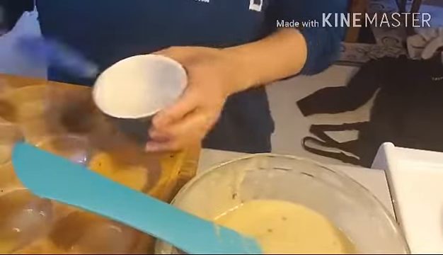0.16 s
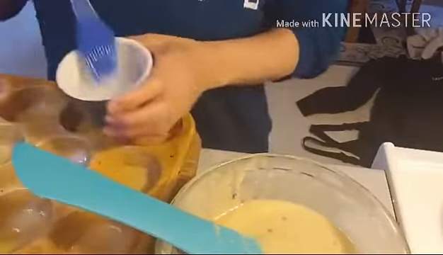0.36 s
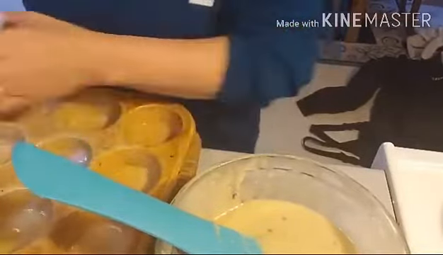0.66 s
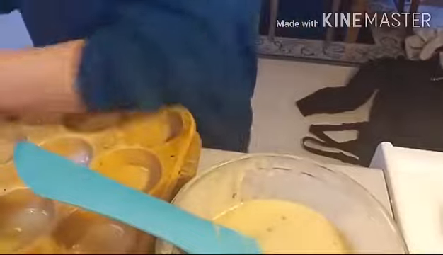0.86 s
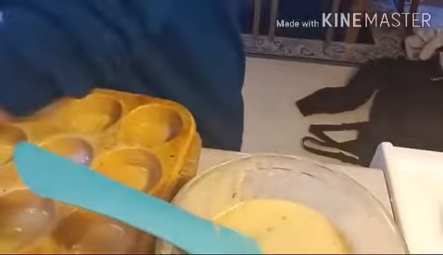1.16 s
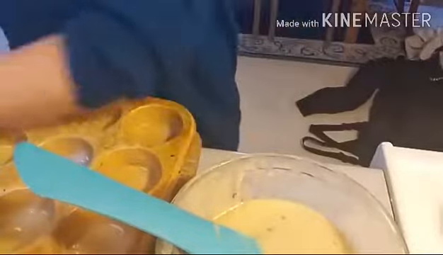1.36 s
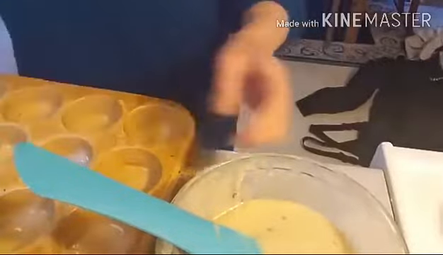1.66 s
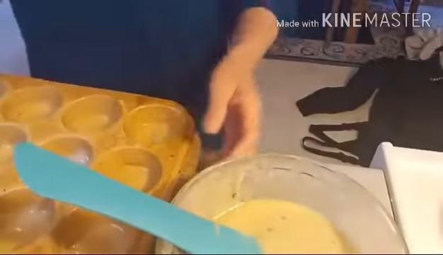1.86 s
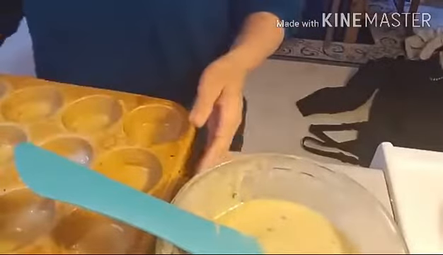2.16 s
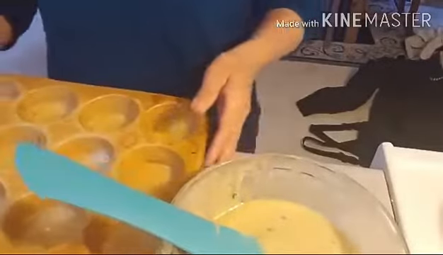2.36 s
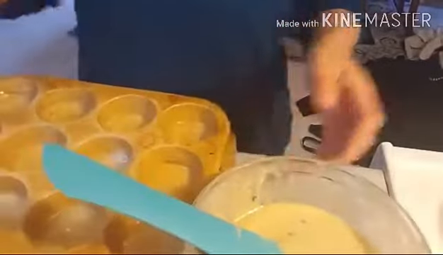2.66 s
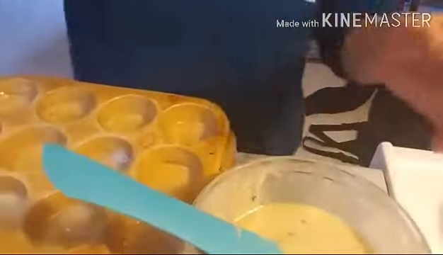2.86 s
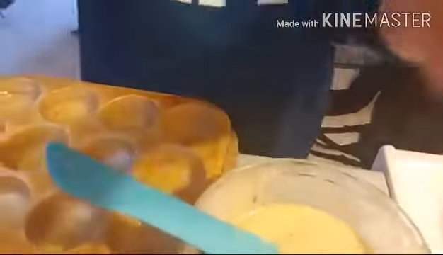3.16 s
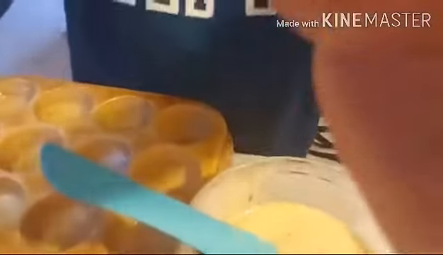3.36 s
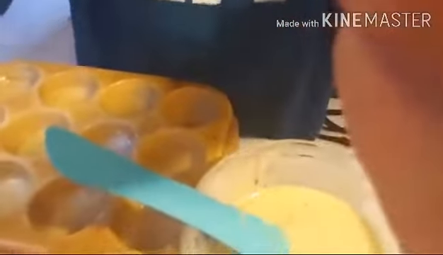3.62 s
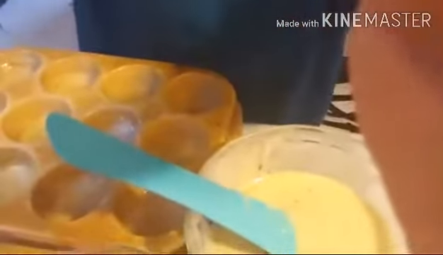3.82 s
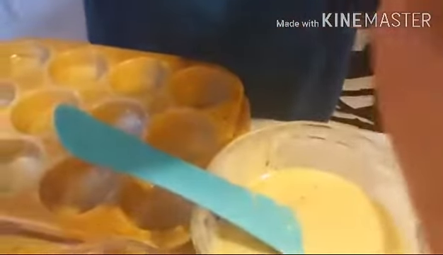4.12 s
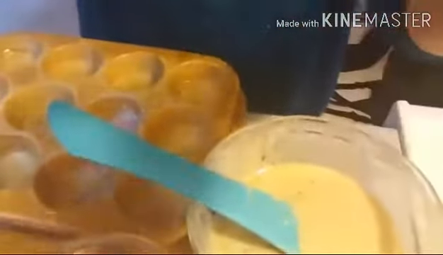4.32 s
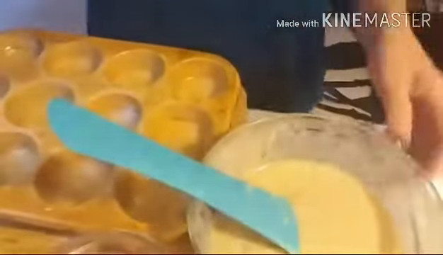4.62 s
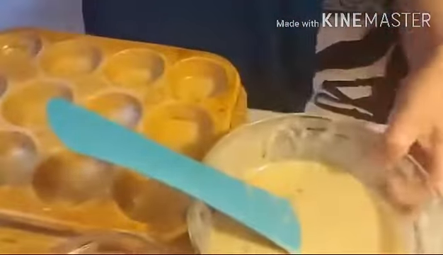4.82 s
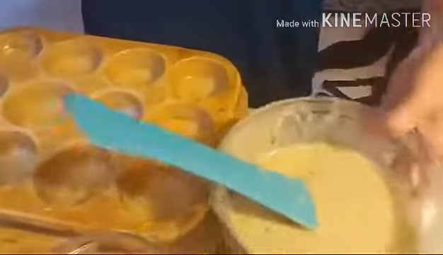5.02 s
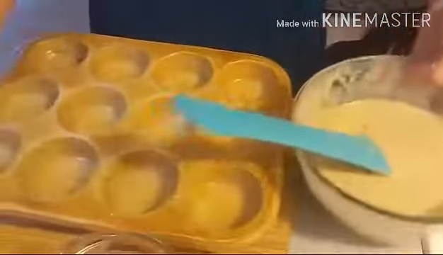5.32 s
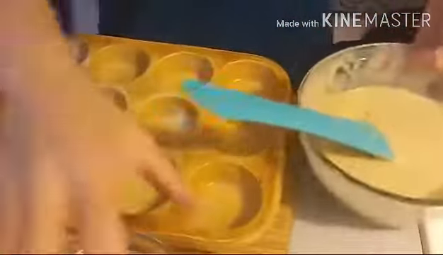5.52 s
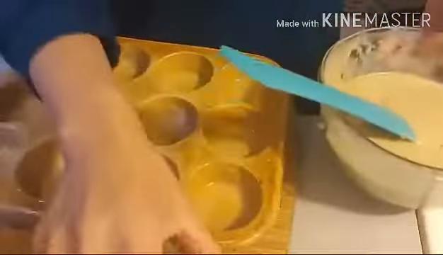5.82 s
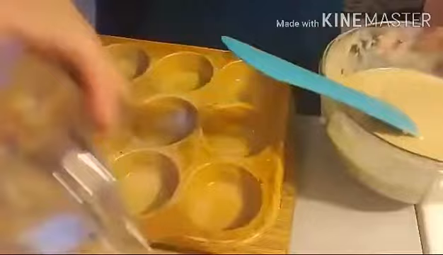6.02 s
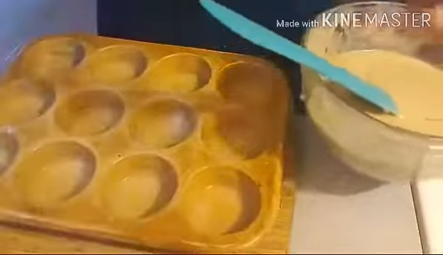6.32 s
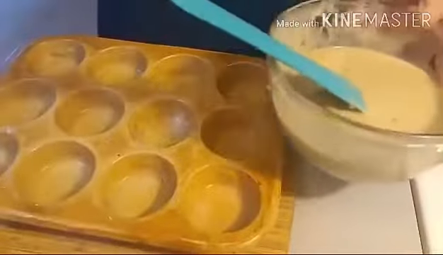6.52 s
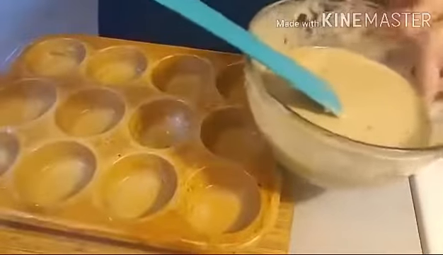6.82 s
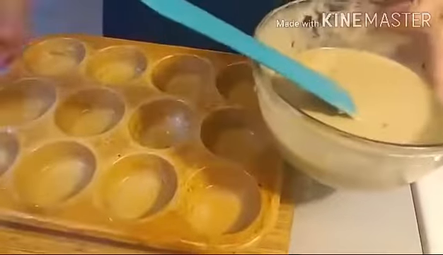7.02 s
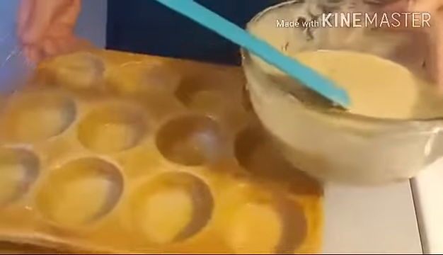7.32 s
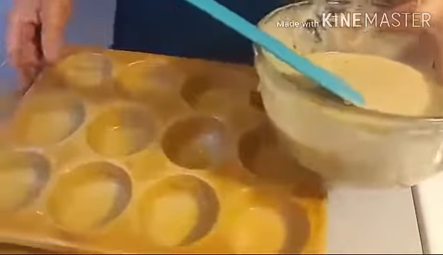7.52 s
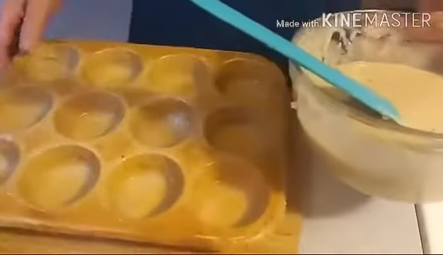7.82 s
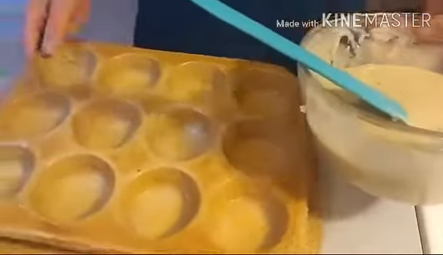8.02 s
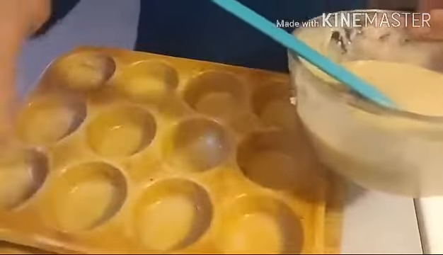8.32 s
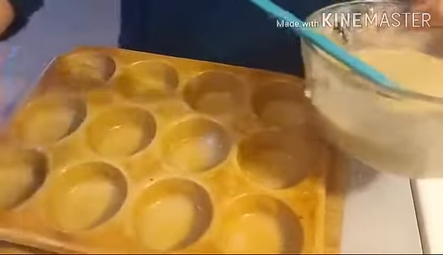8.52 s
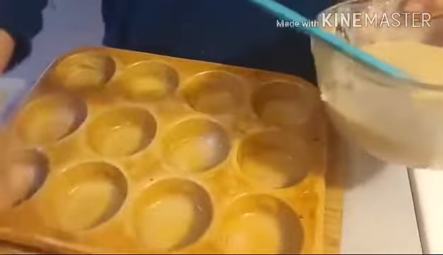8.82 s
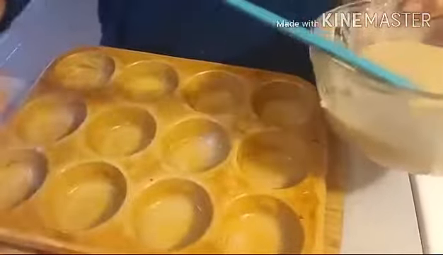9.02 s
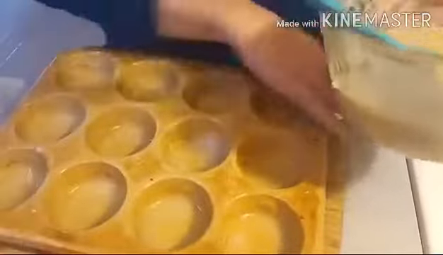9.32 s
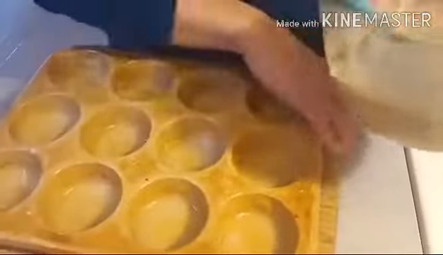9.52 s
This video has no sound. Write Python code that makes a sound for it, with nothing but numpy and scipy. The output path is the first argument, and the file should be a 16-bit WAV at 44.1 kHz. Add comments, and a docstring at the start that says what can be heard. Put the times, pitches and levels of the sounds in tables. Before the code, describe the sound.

Baking things are handled close by on a kitchen counter. A hollow tap comes first, then a cup lands with a light ring. Scattered clusters of dull utensil knocks shake the worktop, with quiet rubbing, rustling and tiny squeaks in the gaps. Near the end a metal muffin tin rattles, a glass bowl clinks briefly and something snaps sharply. A low hum runs underneath in the small room.

```python
"""Baking at a kitchen counter, over the low hum of a small room. A spatula taps a cup; the cup is set
down with a thin ting (1.5 s). Utensils knock on the worktop, which booms under the heaviest
(2.8, 5.6, 6.9 s); between them come rustling sleeves, soft bumps and faint stick-slip squeaks.
A nudged metal muffin tin rocks and clatters (7.7 s). Last, a glass bowl of batter is moved and
clinks (9.1 s), and a hard little snap follows."""
import sys
import numpy as np
from scipy import signal
from scipy.fft import rfft, irfft, next_fast_len
from scipy.io import wavfile
from scipy.ndimage import map_coordinates

SR = 44100
rng = np.random.default_rng(int(sys.argv[2]) if len(sys.argv) > 2 else 0)


def file_out(sig):
    """Save sig as 16-bit WAV at sys.argv[1]."""
    # one column per channel
    cols = np.atleast_2d(sig).T
    # limit, then scale
    lim = np.clip(cols, -1, 1)
    pcm = np.round(lim * 32767).astype(np.int16)
    wavfile.write(sys.argv[1], SR, pcm)


N = 426447
EVENT_N, LEAD_N = SR // 2, SR // 100  # samples per event; silence before its onset
EVENT_TIME_S = (np.arange(EVENT_N) - LEAD_N) / SR


def amp(db):
    """Decibels to gain."""
    return 10 ** (np.asarray(db) / 20)


def unit(x):
    """Scale to rms 1."""
    return x / np.sqrt(np.mean(x ** 2) + 1e-20)


def along(points, hz):
    """Interpolate (Hz, value) points on a log axis."""
    knots_hz, values = np.transpose(points)
    return np.interp(np.log(hz + 1), np.log(knots_hz + 1), values)


def wobble(per_s, size=EVENT_N):
    """Smooth random curve, per_s knots a second."""
    knots = rng.standard_normal(int(size * per_s / SR) + 4)
    return map_coordinates(knots, [np.arange(size) * per_s / SR], order=2)


def filtered(x, response):
    """Apply a gain given as a function of Hz."""
    n = x.shape[-1]
    padded = next_fast_len(n + 4096)
    return irfft(rfft(x, padded) * response(np.fft.rfftfreq(padded, 1 / SR)), padded)[..., :n]


def shaped(x, curve_db):
    """Filter by (Hz, dB) points."""
    return filtered(x, lambda hz: amp(along(curve_db, hz)))


# Stereo width. Each row: frequency in Hz, side minus mid in dB.
STEREO_WIDTH = [(60, -20), (230, -18), (330, -8), (700, -5.5), (1300, -2), (2500, 0), (10000, 0)]
def spread(pair):
    """Mid and side to left and right: bass alike, treble apart."""
    side = shaped(pair[1], STEREO_WIDTH)
    return np.array([pair[0] + side, pair[0] - side])


def noise(curve_db):
    """Coloured stereo noise, rms 1."""
    return unit(spread(shaped(rng.standard_normal((2, N)), curve_db)))


def place(events):
    """Mix (onset in seconds, sound) pairs into a stereo track."""
    track = np.zeros((2, N))
    for start_s, sound in events:
        start = round(start_s * SR) - LEAD_N
        track[:, start:start + sound.shape[-1]] += sound[..., :N - start]
    return track


def fade(t60_s, attack_s):
    """Quick rise, exponential fall."""
    t = np.maximum(EVENT_TIME_S, 0)
    return (1 - np.exp(-(t / attack_s) ** 2)) * amp(-60 * t / t60_s)


def body(modes, hz, base_db, ripple_db, corner_hz=1500):
    """Resonances over a dull base; each point of contact favours different ones."""
    response = amp(base_db) / (1 + 1j * hz / corner_hz)
    for k, (mode_hz, width_hz, db) in enumerate(modes):
        mode_hz *= rng.normal(1, .012)
        gain = (-1) ** k * amp(rng.normal(db, 2))
        damping = 1j * hz * width_hz
        response += gain * damping / (mode_hz ** 2 - hz ** 2 + damping)
    # crowded upper modes: a random ripple, causal so that its peaks ring on
    ripple = map_coordinates(rng.standard_normal(SR // 100), [hz / 160], order=2)
    ripple *= np.clip(hz / 3000, 0, 1)
    log_gain = np.log(amp(ripple_db * np.tanh(ripple)))
    upper_modes = np.exp(np.conj(signal.hilbert(log_gain)))
    rolloff_db = [(30, -10), (115, -7.5), (190, -3.5), (8000, -1.5), (11000, -5.5), (13000, -10)]
    return response * upper_modes * amp(along(rolloff_db, hz))


def contacts(table, t60_s, settle_s, settle_t60_s):
    """An object lands on one edge, then settles on the other with a longer rattle."""
    return [[(start_s, db, hardness_db, t60_s),
             (start_s + settle_s, db + settle_db, hardness_db, settle_t60_s)]
            for start_s, db, hardness_db, settle_db in table]


# Edges in Hz of the four bands: thud, knock, clack, tick.
BAND_EDGES_HZ = [90, 450, 1100, 3200, 13500]
def blows(landings, bands, modes, base_db, attack_s, treble_damping):
    """Each contact is a burst of chatter through the struck body; level and hardness set its bands."""
    hz = np.fft.rfftfreq(EVENT_N, 1 / SR)
    limits_hz = list(zip(BAND_EDGES_HZ, BAND_EDGES_HZ[1:]))
    centres_hz = np.sqrt(np.prod(limits_hz, axis=1))
    treble_share = hz ** 2 / (hz ** 2 + 3000 ** 2)
    width = amp(along(STEREO_WIDTH, hz))
    offset_db, hardness_slope = np.transpose(bands)
    events = []
    for landing in landings:
        colour = body(modes, hz, base_db, ripple_db=8)
        for start_s, db, hardness_db, t60_s in landing:
            chatter = rng.standard_normal((2, EVENT_N)) * amp(3.5 * wobble(per_s=200))
            bulk = rfft(chatter * fade(t60_s, attack_s))
            treble = rfft(chatter * fade(t60_s / treble_damping, attack_s * .8))
            mid, side = colour * (bulk * (1 - treble_share) + treble * treble_share)
            spectrum = np.array([mid + width * side, mid - width * side])
            target_db = db + offset_db + hardness_db * hardness_slope
            for _ in range(3):  # a band's level is its whole energy, counted as if spread over 20 ms
                power = np.mean(abs(spectrum) ** 2, axis=0) * 2 / EVENT_N / (.02 * SR)
                band_db = [10 * np.log10(power[(hz >= lo) & (hz < hi)].sum()) for lo, hi in limits_hz]
                spectrum *= amp(along(np.c_[centres_hz, target_db - band_db], hz))
            events.append((start_s, irfft(spectrum, EVENT_N)))
    return place(events)


def ring(modes, roughness):
    """Fading partials that beat as the object chatters; phase differs left and right."""
    sound = np.zeros((2, EVENT_N))
    for hz, db, t60_s in modes:
        stereo_phase = amp(along(STEREO_WIDTH, hz)) * rng.uniform(-np.pi, np.pi, (2, 1))
        phase = rng.uniform(0, 2 * np.pi) + stereo_phase + roughness * wobble(180 * roughness)
        beating = amp(3 * roughness * wobble(180 * roughness))
        partial = np.sin(2 * np.pi * hz * EVENT_TIME_S + phase)
        sound += amp(rng.normal(db, .71)) * beating * partial * fade(t60_s, attack_s=.00019)
    return sound


def thump(t60_s):
    """A low push with no ring."""
    curve_db = [(30, -11), (80, 1), (165, -.5), (280, -17.5), (700, -30.5), (2000, -67)]
    push = unit(shaped(rng.standard_normal(EVENT_N), curve_db))
    return amp(6) * push * fade(t60_s, attack_s=.016)


# Recording gain heard on the hum: it dips after loud knocks, then recovers.
# Each row: time in seconds, relative gain in dB.
HUM_GAIN = [(0, -54), (1.45, -51.5), (1.95, -58.5), (3.7, -60), (4.6, -57.5), (5.25, -52.5), (6.3, -58),
            (8, -55.5), (9.67, -56.5)]
# Rushing air. Each row: frequency in Hz, relative density in dB.
HUM_SPECTRUM = [(22, -17.5), (60, 0), (110, -7), (245, -5.5), (300, -14), (365, -10.5), (450, -20),
                (700, -23), (1060, -41), (2300, -44.5), (13000, -65)]
# Tones in the hum. Each row: frequency in Hz, relative level in dB.
HUM_TONES = [(164, -6), (246, -5.5), (356, -12)]
def hum():
    """Room hum, likely an appliance: low rushing air and wavering tones."""
    t = np.arange(N) / SR
    tones = sum(amp(db) * np.sin(2 * np.pi * hz * t + .29 * wobble(5.9, N)) for hz, db in HUM_TONES)
    gain_db = np.interp(t, *np.transpose(HUM_GAIN))
    return amp(gain_db - 5) * (noise(HUM_SPECTRUM) + tones)


# Noise floor. Each row: frequency in Hz, relative density in dB.
HISS_SPECTRUM = [(100, -0.5), (1500, -1), (4000, -5), (7500, 3), (13000, -14.5)]
def hiss():
    """Steady microphone hiss."""
    return amp(-88) * noise(HISS_SPECTRUM)


# Spatula on cup. Each row: start in seconds, level in dB, hardness in dB, settling offset in dB.
CUP_TAPS = [(.0615, -33, 0, -20)]
# Cup bands, thud to tick. Each row: offset in dB, dB per dB of hardness.
CUP_BANDS = [(-14, 0), (1, 0), (-2, 0), (-26, 0)]
# Cup resonances. Each row: frequency in Hz, width in Hz, gain in dB.
CUP_MODES = [(720, 220, 0), (1080, 260, 0), (1750, 260, -4), (3240, 400, -22), (4360, 500, -30)]
def cup_tap():
    """One dry, hollow tap of the spatula on the cup."""
    landings = contacts(CUP_TAPS, t60_s=.067, settle_s=.017, settle_t60_s=.088)
    return blows(landings, CUP_BANDS, CUP_MODES, base_db=-45.5, attack_s=.00059, treble_damping=1)


# Things put down. Each row: start in seconds, level in dB, hardness in dB, settling offset in dB.
KNOCKS = [(0.319, -58, -26, 3), (.645, -61.5, -26, -2), (1.545, -22, 1, -5), (1.628, -40, -11.5, -16),
          (1.647, -25, 7, -1.5), (1.721, -50, 12.5, -8), (2.672, -43, -22.5, -7), (2.679, -52, 11.5, -5),
          (2.814, -32, 10.5, -3), (2.82, -22, 7, -11.5), (2.828, -25.5, 12, -11.5), (2.877, -35, 7.5, -22),
          (2.924, -43.5, 10, -27), (5.312, -56, -7.5, 6), (5.486, -29, -5.5, 1), (5.561, -19, 1, -25),
          (5.687, -28, 5.5, -6), (5.75, -30, 5, -2.5), (6.04, -63, -12, 7.5), (6.188, -42.5, -21, -31),
          (6.595, -55.5, -3, -15), (6.876, -39, 7, -10), (6.908, -46, 10.5, -9), (6.927, -18, 0.5, -16.5),
          (6.928, -42, 8, -28), (7.04, -30, -2, -4), (7.244, -51.5, -4, -5), (8.103, -47, -5, -24.5),
          (9.273, -41, 11, -11.5)]
# Worktop bands, thud to tick. Each row: offset in dB, dB per dB of hardness.
WORKTOP_BANDS = [(-2.5, -0.21), (-1, 0), (-10.5, 1.1872), (-30, 2)]
# Worktop resonances. Each row: frequency in Hz, width in Hz, gain in dB.
WORKTOP_MODES = [(320, 130, -4), (410, 50, -5), (526, 240, 2), (790, 180, -1), (1380, 200, -8),
                 (1840, 130, -7), (3000, 500, -24), (3850, 400, -17), (4400, 700, -19), (5300, 300, -27)]
def worktop_knocks():
    """Dull knocks of things landing and settling on the worktop."""
    landings = contacts(KNOCKS, t60_s=.05, settle_s=.01, settle_t60_s=.19)
    return blows(landings, WORKTOP_BANDS, WORKTOP_MODES,
                 base_db=-11.5, attack_s=.0009, treble_damping=1.7)


def worktop_shudder():
    """The worktop shakes under each knock and each landing of the tin."""
    return place((start_s, amp(db - 26) * thump(t60_s=.39)) for start_s, db, _, _ in KNOCKS + TIN_HITS)


# Rubbed surfaces. Each row: frequency in Hz, width in Hz, gain in dB.
RUB_MODES = [(485, 140, -2.5), (780, 130, 5), (1250, 220, -4), (2150, 500, 0)]
def rub(centre_hz):
    """Tiny catches and slips excite a surface; its colour shifts as the contact wanders."""
    catches = amp(3.2 * wobble(45) + 3.2 * wobble(700))
    texture_db = [(.035 * centre_hz, -20), (.084 * centre_hz, -6), (centre_hz, 0), (4 * centre_hz, -14)]

    def surface(hz):
        resonances = body(RUB_MODES, hz, base_db=-7, ripple_db=6, corner_hz=6400)
        return amp(along(texture_db, hz)) * resonances

    def spot():
        friction = spread(rng.standard_normal((2, EVENT_N))) * catches
        return unit(filtered(friction, surface))

    here, there = spot(), spot()
    wander = wobble(14)
    return np.cos(wander) * here + np.sin(wander) * there


# Rubbing strokes. Each row: start in seconds, length in seconds, level in dB, centre in Hz.
STROKES = [(0.943, 0.082, -68.5, 4650), (1.153, 0.13, -64, 4170), (1.296, 0.1, -60, 2150),
           (1.857, 0.38, -73.5, 2150), (2.474, 0.16, -73, 1500), (2.707, 0.2153, -52.5, 2345),
           (3.811, 0.41, -74.5, 2818), (4.188, 0.23, -62.5, 2790), (5.302, 0.81, -50, 970),
           (5.438, 0.23, -45.5, 1377), (6.546, 0.27, -78, 6600), (7.565, 0.26, -52, 3510),
           (7.706, 0.035, -33, 5350), (8.086, 0.13, -47, 2630), (8.353, 0.37, -61, 5500),
           (8.388, 0.32, -58, 750), (9.274, 0.15, -46, 5800), (9.417, 0.21, -61, 2090)]
def rustle():
    """Sleeves, hands and the sliding tin rub; strokes swell and fade, cut off at 0.49 s."""
    events = []
    for start_s, length_s, db, centre_hz in STROKES:
        swell = np.sin(np.pi * np.clip(EVENT_TIME_S / length_s, 0, 1))
        events.append((start_s, amp(db) * rub(centre_hz) * swell))
    return place(events)


# Low bumps. Each row: start in seconds, relative level in dB, T60 in seconds.
BUMPS = [(1.093, -52, 0.48), (2.518, -50.5, 0.2), (3.17, -38, 0.21), (3.76, -40.5, 0.1),
         (4.279, -51.5, 0.28), (4.35, -50, 0.2), (4.958, -50, 0.2), (5.326, -51.5, 0.3),
         (7.545, -34.5, 0.086), (8.341, -51.5, 0.22)]
def bumps():
    """Soft, heavy contacts as the cook moves about."""
    return place((start_s, amp(db) * thump(t60_s)) for start_s, db, t60_s in BUMPS)


# Thin squeaks. Each row: start in seconds, length in seconds, first and last pitch in Hz,
# level in dB, octave offset in dB.
SQUEAKS = [(1.345, .11, 4000, 3980, -68, -9), (1.398, .05, 3440, 3400, -63, -2),
           (1.458, .05, 3460, 3410, -59, -3), (1.518, .03, 3950, 4000, -61, -14),
           (1.603, .045, 4060, 4020, -56, -14), (2.485, .05, 1520, 1460, -66, -30),
           (3.37, .13, 5070, 5160, -68, -20), (3.49, .07, 4950, 4730, -73, -25),
           (3.66, .11, 2720, 2380, -75, -30), (3.95, .16, 4180, 4220, -67, -17)]
def squeaks():
    """Unsteady stick-slip whistles with an octave overtone."""
    events = []
    for start_s, length_s, first_hz, last_hz, db, octave_db in SQUEAKS:
        progress = np.clip(EVENT_TIME_S / length_s, 0, 1)
        rasp_hz = 42 * wobble(700)
        hz = first_hz + (last_hz - first_hz) * progress + rasp_hz
        grip = amp(5 * wobble(45)) * np.sin(np.pi * progress)
        phase = 2 * np.pi * np.cumsum(hz) / SR
        whistle = np.sin(phase) + amp(octave_db) * np.sin(2 * phase)
        events.append((start_s, amp(db) * grip * whistle))
    return place(events)


# Cup tings. Each row: start in seconds, level in dB.
TINGS = [(1.551, -41.5), (1.653, -47)]
# Cup partials. Each row: frequency in Hz, gain in dB, T60 in seconds.
TING_PARTIALS = [(7050, 0, .15), (11100, -10, .1)]
def cup_tings():
    """The cup rings thin and high as it is set down."""
    return place((start_s, amp(db) * ring(TING_PARTIALS, roughness=1.2)) for start_s, db in TINGS)


# Utensil jingles. Each row: start in seconds, level in dB.
JINGLES = [(2.682, -40), (7.041, -55.5)]
# Utensil partials. Each row: frequency in Hz, gain in dB, T60 in seconds.
UTENSIL_PARTIALS = [(2570, -3, .04), (4660, 0, .1), (6530, -8, .07), (7270, -7, .07)]
def utensil_jingles():
    """A metal utensil rings faintly with some knocks."""
    return place((start_s, amp(db) * ring(UTENSIL_PARTIALS, roughness=1.4)) for start_s, db in JINGLES)


# Worktop booms. Each row: start in seconds, level in dB.
BOOMS = [(2.825, -22.5), (5.564, -25), (6.93, -31.5)]
# Worktop partials. Each row: frequency in Hz, gain in dB, T60 in seconds.
BOOM_PARTIALS = [(200, 0, .17), (518, -2, .13)]
def worktop_booms():
    """The heaviest knocks ring the worktop's low modes."""
    return place((start_s, amp(db) * ring(BOOM_PARTIALS, roughness=.6)) for start_s, db in BOOMS)


# Hard snaps. Each row: start in seconds, level in dB, hardness in dB, settling offset in dB.
SNAPS = [(5.688, -42.5, -1, 7.5), (6.876, -46, -2.5, -8.5), (9.364, -20, 0, -11.5)]
# Snap bands, thud to tick. Each row: offset in dB, dB per dB of hardness.
SNAP_BANDS = [(-27.5, 0), (-21, 0), (-12.5, 0), (-2.5, 0)]
# Snap resonances. Each row: frequency in Hz, width in Hz, gain in dB.
SNAP_MODES = [(1188, 510, -20), (2950, 400, -14), (4200, 700, -2), (5350, 1100, -2), (7300, 1600, -1),
              (8700, 900, -2), (11000, 1500, -4)]
def snaps():
    """Small hard contacts, nearly all treble, alone or on top of a knock."""
    landings = contacts(SNAPS, t60_s=.028, settle_s=.006, settle_t60_s=.05)
    return blows(landings, SNAP_BANDS, SNAP_MODES, base_db=-8, attack_s=.001, treble_damping=2)


# Tin landings. Each row: start in seconds, level in dB, hardness in dB, settling offset in dB.
TIN_HITS = [(7.602, -64.5, 21, -22), (7.684, -28, -2.5, -20.5), (7.722, -33.5, 5, -0.5),
            (7.759, -24.5, 0, -2), (7.791, -37, 3.5, -25.5), (7.873, -24, -1, -12),
            (8.187, -33.5, -0.5, -36), (8.403, -64, 9.5, -2.5), (8.847, -67.5, -0.5, 13.5)]
# Tin bands, thud to tick. Each row: offset in dB, dB per dB of hardness.
TIN_BANDS = [(-10.5, 0.028), (2, 0.0087), (4, 0.29), (-6.5, 1)]
# Tin resonances. Each row: frequency in Hz, width in Hz, gain in dB.
TIN_MODES = [(720, 65, 3.5), (1190, 260, -6), (1380, 240, -4), (1740, 150, 4), (2110, 130, -10),
             (3060, 240, -9), (3600, 600, -12), (4350, 600, -12), (5700, 900, -21), (7700, 900, -20),
             (11100, 900, -22)]
def muffin_tin():
    """Sheet metal rocks and rattles on the counter."""
    landings = contacts(TIN_HITS, t60_s=.04, settle_s=.013, settle_t60_s=.06)
    return blows(landings, TIN_BANDS, TIN_MODES, base_db=-19, attack_s=.0016, treble_damping=1.4)


# Bowl clinks. Each row: start in seconds, relative level in dB, hardness in dB, settling offset in dB.
CLINKS = [(9.057, -27, -4, -5.5), (9.154, -33.5, -14.5, 2), (9.184, -46.5, -9, 6)]
# Bowl bands, thud to tick. Each row: offset in dB, dB per dB of hardness.
BOWL_BANDS = [(-11.5, 0.04), (-1.5, 0.055), (5.5, 0.96), (-9.5, 0.3)]
# Glass partials. Each row: frequency in Hz, gain in dB, T60 in seconds.
GLASS_PARTIALS = [(665, -10, .45), (781, -12, .25), (1432, -2, .22), (2082, -5, .36), (2460, -13, .35),
                  (2988, -7, .15), (4177, -9, .22), (4468, -15, .18), (5443, -13, .2), (5900, -11, .09),
                  (6950, -15, .14), (7480, -11, .14), (7750, -14, .14), (8550, -17, .16), (9232, -13, .13),
                  (11390, -12, .12), (11860, -13, .13)]
# Clack resonances. Each row: frequency in Hz, width in Hz, gain in dB.
BOWL_MODES = [(728, 41, -1.5), (1380, 705, 0), (2640, 950, -8.5), (7300, 1400, -33.5)]
def glass_bowl():
    """A hard clack, then the glass rings briefly, damped by the batter."""
    landings = contacts(CLINKS, t60_s=.029, settle_s=.016, settle_t60_s=.2)
    clacks = blows(landings, BOWL_BANDS, BOWL_MODES, base_db=-15, attack_s=.0014, treble_damping=1.2)
    ringing = place((start_s, amp(db + hardness_db + 9) * ring(GLASS_PARTIALS, roughness=.5))
                    for landing in landings for start_s, db, hardness_db, _ in landing)
    return amp(3) * clacks + ringing


# Room decay. Each row: frequency in Hz, T60 in seconds.
KITCHEN_DECAY = [(150, .32), (600, .25), (2000, .23), (5000, .24), (12000, .2)]
def kitchen_reverb(x):
    """Short room tail; each frequency dies at its own rate."""
    hz, t, spectra = signal.stft(rng.standard_normal((2, SR // 2)), SR, nperseg=256)
    decay = amp(-60 * t / along(KITCHEN_DECAY, hz)[:, None])
    tail = spread(signal.istft(spectra * decay, SR, nperseg=256)[1])
    tail /= np.linalg.norm(tail[0])
    delayed = np.pad(tail, ((0, 0), (SR // 125, 0)))  # 8 ms
    wet = signal.fftconvolve(x, delayed, axes=1)[:, :N]
    return shaped(wet, [(150, -12.5), (600, -13), (2000, -13), (8000, -14.5)])


def scene():
    """Handling sounds and their reverb, over hum and hiss."""
    handling = cup_tap() + worktop_knocks() + utensil_jingles() + cup_tings() + worktop_booms()
    handling += muffin_tin() + glass_bowl() + snaps()
    handling += bumps() + worktop_shudder() + rustle() + squeaks()
    return handling + kitchen_reverb(handling) + hum() + hiss()


def record(dry):
    """Soft peak limit, then a steep low-pass."""
    ceiling, cutoff_hz = .6, 13300
    rounded = dry / (1 + (dry / ceiling) ** 6) ** (1 / 6)
    return filtered(rounded, lambda hz: 1 / np.sqrt(1 + (hz / cutoff_hz) ** 120))


dry = scene()
out = record(dry)
file_out(out)
```